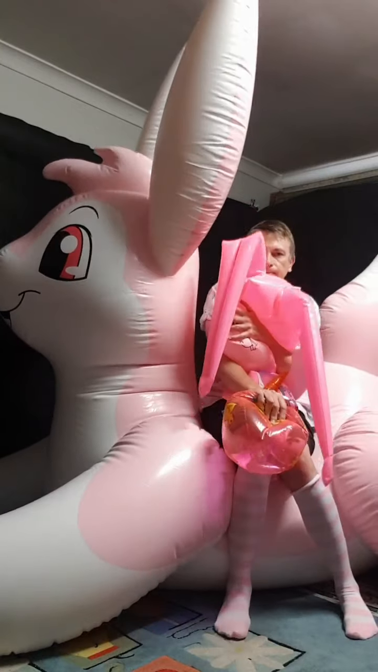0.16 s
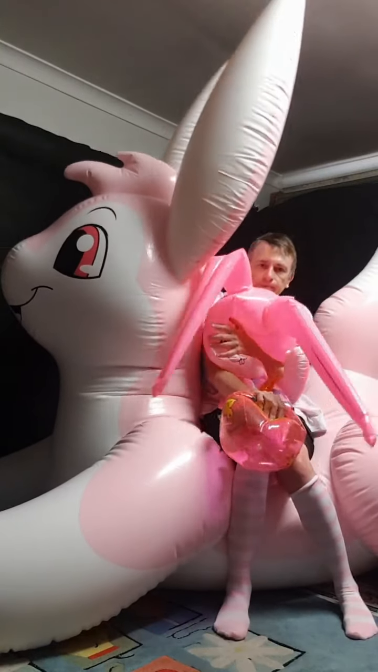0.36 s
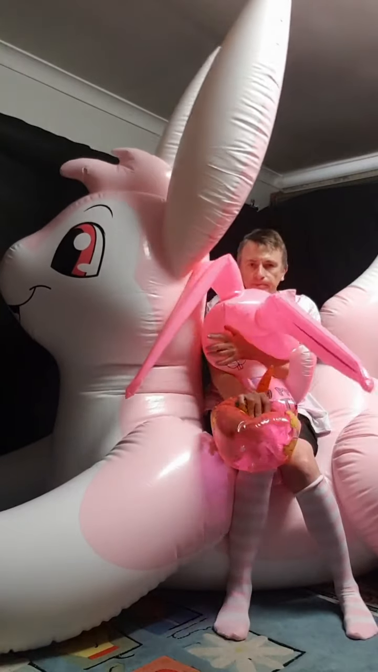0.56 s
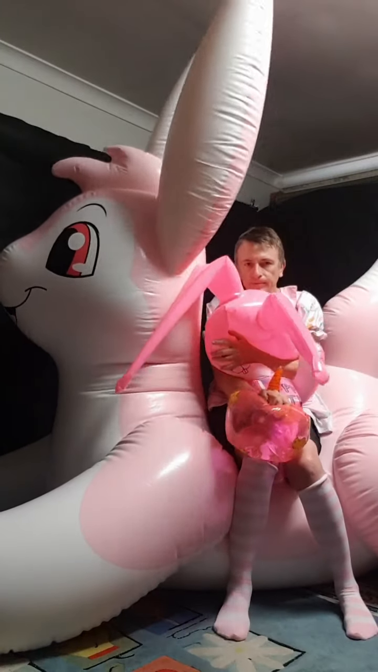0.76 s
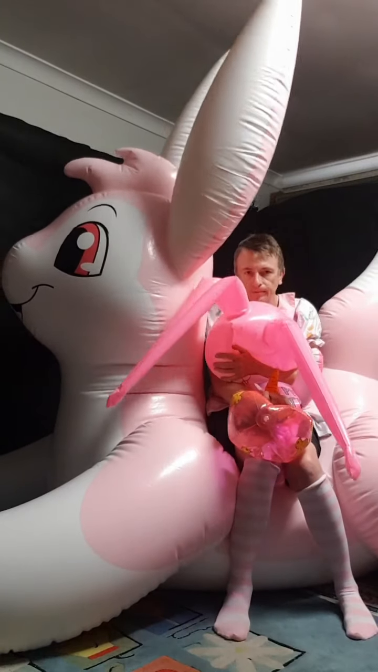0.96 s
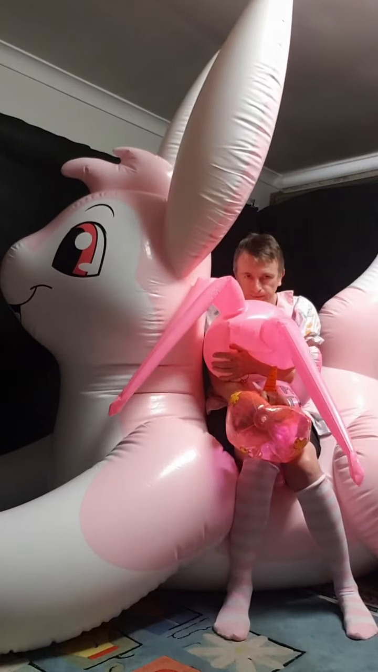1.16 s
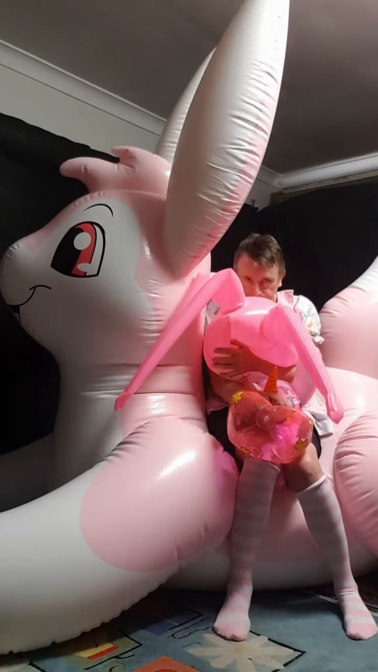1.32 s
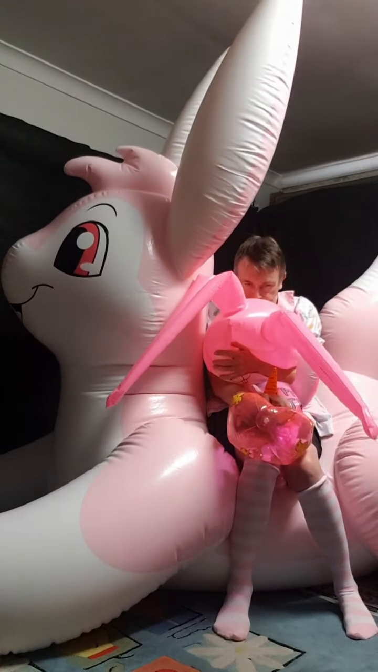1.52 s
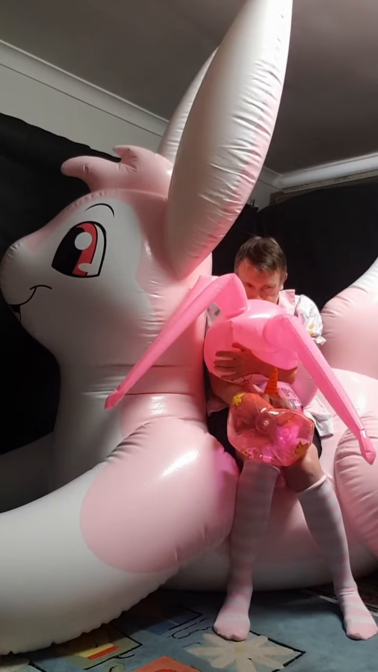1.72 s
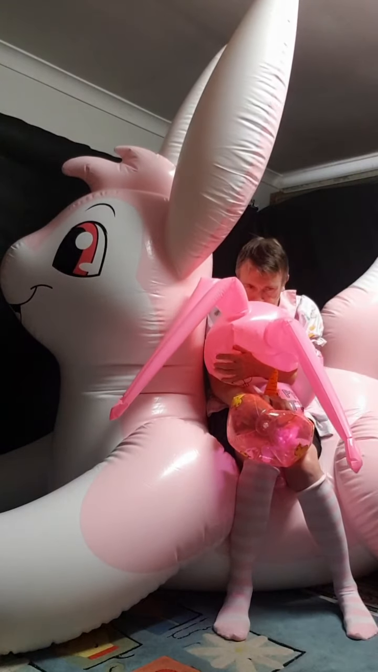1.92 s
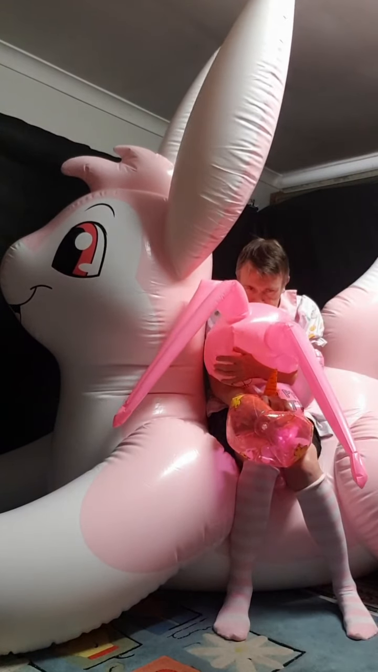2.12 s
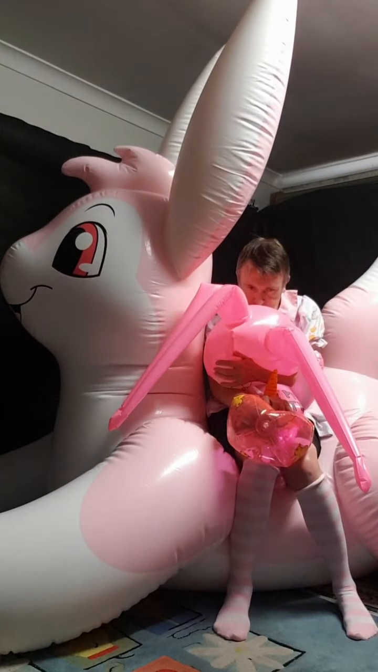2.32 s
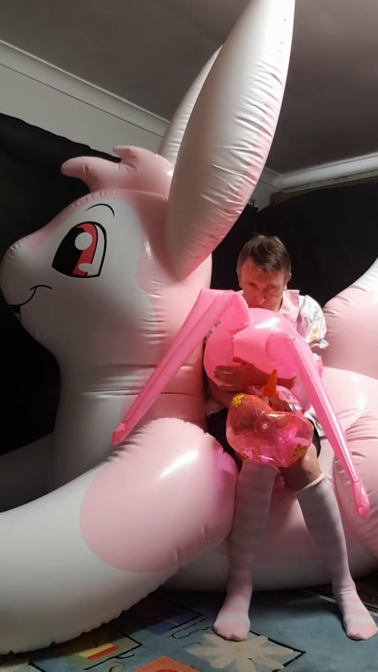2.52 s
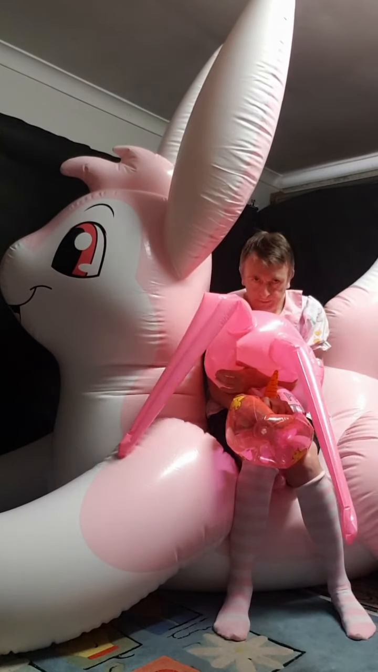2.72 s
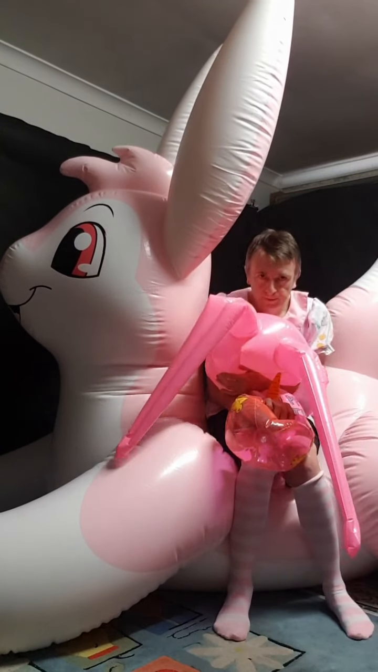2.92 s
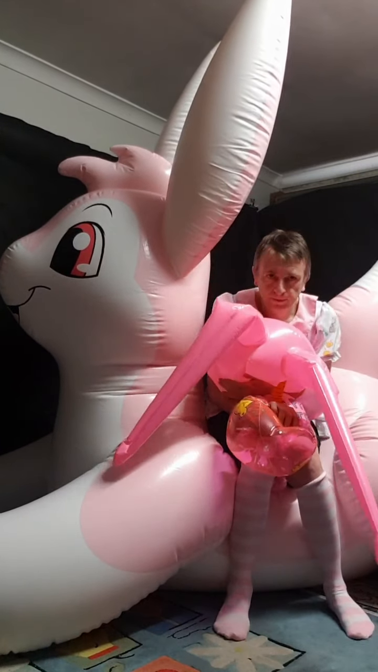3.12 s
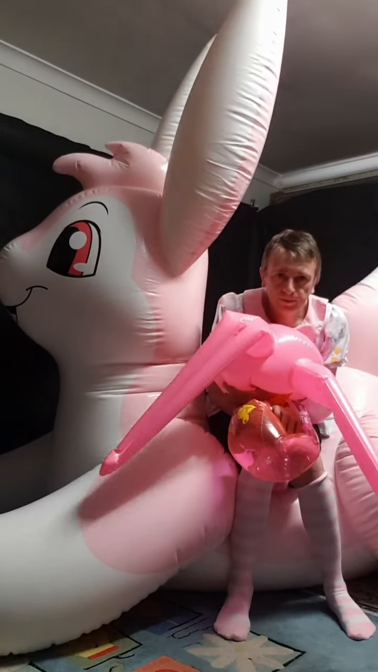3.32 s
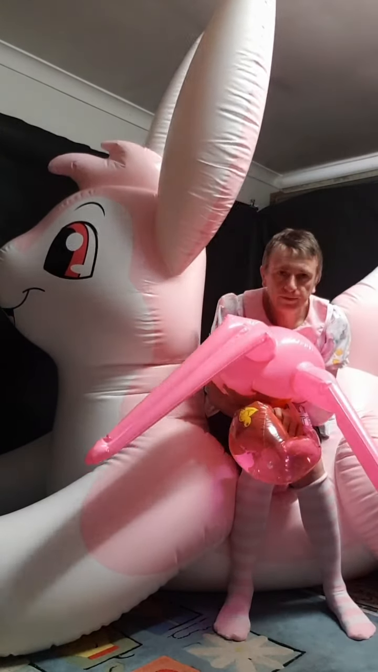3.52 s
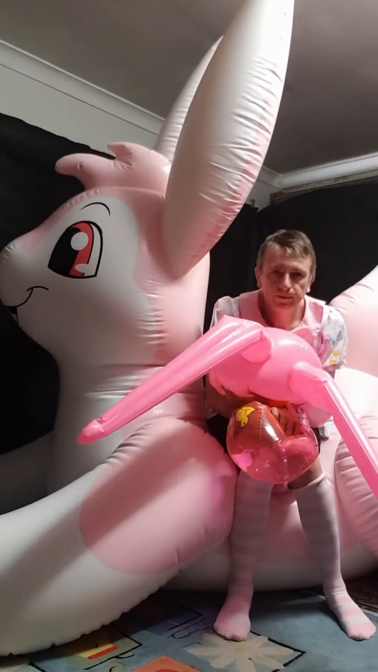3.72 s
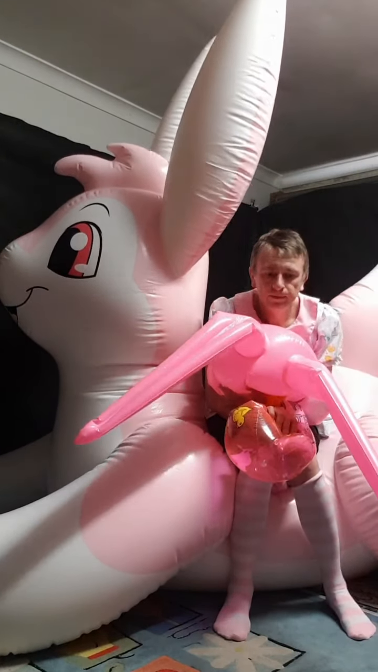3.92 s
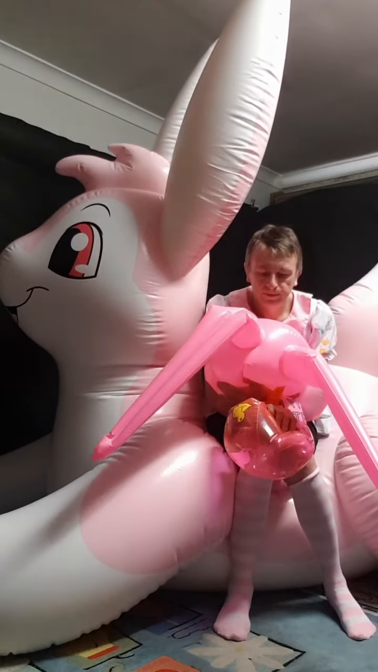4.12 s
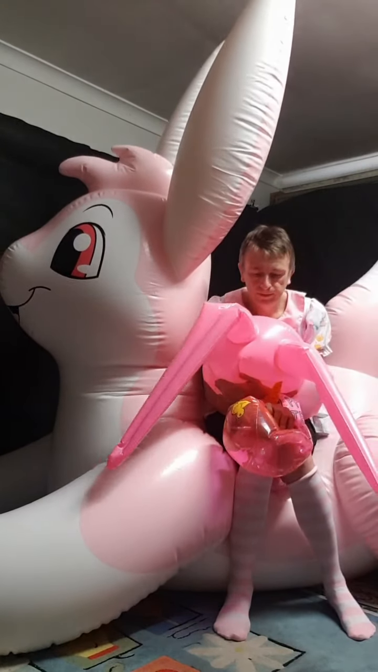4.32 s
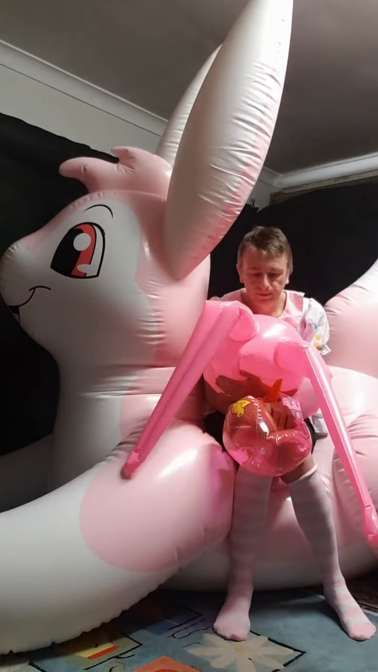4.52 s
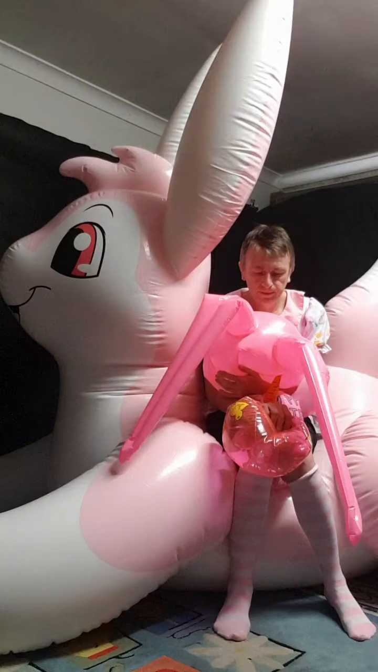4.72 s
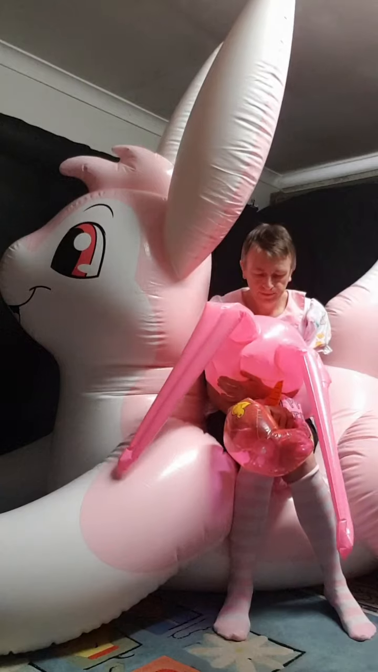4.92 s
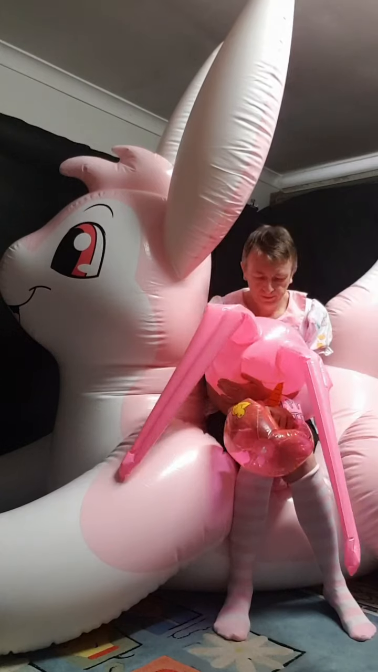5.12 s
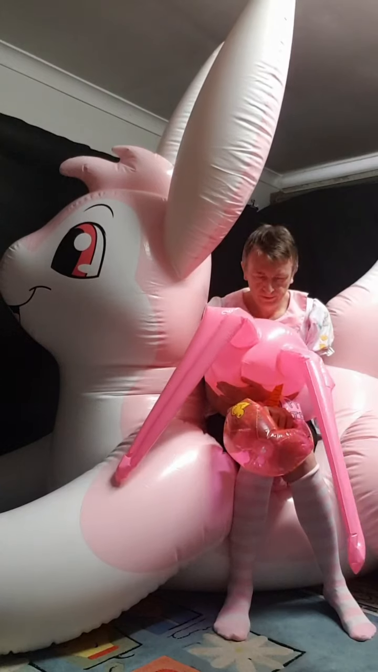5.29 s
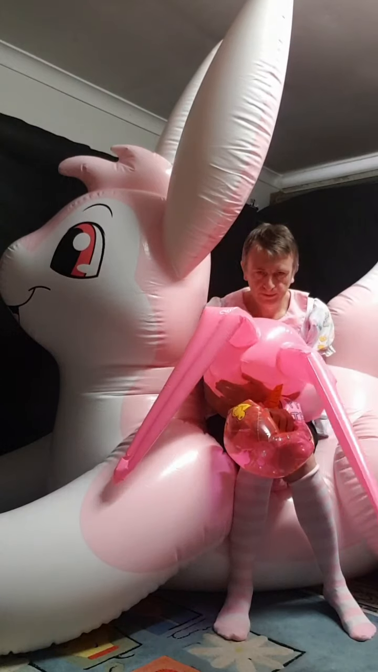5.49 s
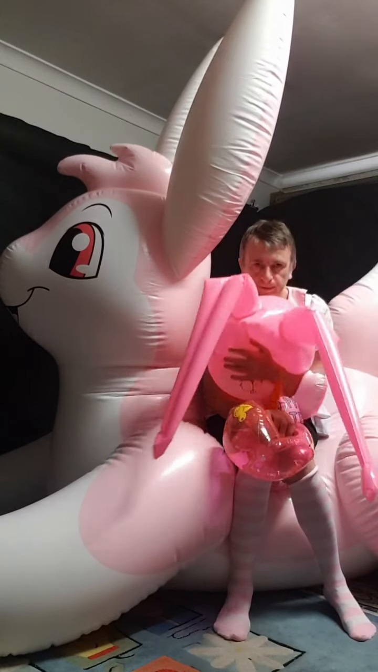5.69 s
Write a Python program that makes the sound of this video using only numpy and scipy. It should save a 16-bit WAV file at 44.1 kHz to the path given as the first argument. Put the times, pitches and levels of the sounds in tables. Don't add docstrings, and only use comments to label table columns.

```python
import sys
import numpy as np
from scipy import signal
from scipy.fft import rfft, irfft
from scipy.io import wavfile

SR = 44100
rng = np.random.default_rng(int(sys.argv[2]) if len(sys.argv) > 2 else 0)


def ratio_of_db(decibels):
    return 10 ** (np.asarray(decibels, float) / 20)


def generate_wav(signal):
    frames = np.transpose(np.atleast_2d(signal))
    scaled = np.clip(frames, -1, 1) * 32767
    pcm = np.round(scaled).astype(np.int16)
    wavfile.write(sys.argv[1], SR, pcm)


N = 253575

# (time [s], jet tone [Hz], tone level [dB], second partial level [dB])
RISING_TONE = [
    (2.215, 1946, -67, -97),
    (2.261, 2356, -65, -75),
    (2.331, 2922, -48.5, -58),
    (2.365, 3007, -61, -43),
    (2.422, 3193, -68, -48),
    (2.5, 3242, -73, -46.5),
    (2.637, 3468, -67, -44.5),
    (2.754, 3492, -70, -42.5),
    (2.81, 3730, -82, -56.5),
]
# (time [s], jet tone [Hz], tone level [dB], second partial level [dB])
CLIMBING_TONE = [
    (2.78, 4780, -51.5, -68),
    (2.869, 4990, -51, -62),
    (2.9, 5069, -36.5, -63.5),
    (2.989, 5142, -42, -55.5),
    (3.11, 5146, -42.5, -56),
    (3.149, 5395, -40, -56.5),
    (3.289, 6213, -32.5, -46.5),
]
# (time [s], jet tone [Hz], tone level [dB], second partial level [dB])
SINKING_TONE = [
    (3.388, 6240, -35.5, -48),
    (3.477, 5997, -37, -48.5),
    (3.63, 5913, -31.5, -53.5),
    (3.712, 5827, -34, -51),
    (3.759, 5608, -36, -53),
    (3.841, 5504, -40.5, -52),
    (3.91, 5173, -42.5, -56),
    (4.011, 4945, -46.5, -66),
    (4.061, 4260, -70, -76),
]
# (time [s], jet tone [Hz], tone level [dB], second partial level [dB])
FALLING_TONE = [
    (4.05, 3200, -88, -50.5),
    (4.086, 3150, -60, -49.5),
    (4.166, 2967, -59.5, -55.5),
    (4.246, 2835, -62, -62),
    (4.29, 2360, -73, -81),
]
# (start [s], length [s], pitch [Hz], tone level [dB], second partial level [dB])
WEAK_WHISTLES = [
    (0.148, 0.063, 1737, -69.5, -68),
    (0.851, 0.038, 2800, -65, -65),
    (0.924, 0.13, 2890, -55, -63),
    (1.061, .09, 3220, -66.5, -64),
    (4.981, 0.13, 2974, -59.5, -56),
    (5.11, 0.28, 2973, -67.5, -59),
    (5.417, 0.093, 2886, -56.5, -60),
]
# (start [s], length [s], first pitch [Hz], last pitch [Hz], level [dB])
EDGE_TONES = [(0.051, 0.12, 1237, 2000, -75), (0.827, .04, 3300, 3500, -68), (.9, .04, 3355, 3500, -61.5),
              (1, .05, 3520, 3560, -82), (1.128, 0.04, 3000, 2225, -67), (1.287, 0.079, 1750, 2170, -71),
              (1.35, 0.19, 2240, 2160, -68.5), (1.494, 0.093, 1974, 1713, -69),
              (1.37, 0.14, 6600, 6650, -79), (1.781, 0.043, 1635, 1960, -68.5),
              (1.92, .13, 6060, 5920, -72.5), (4.03, 0.058, 4440, 4540, -59.5),
              (4.94, 0.064, 2600, 2300, -69), (5.239, 0.23, 3413, 3320, -61), (5.5, .06, 2850, 2040, -68)]
# (start [s], length
# [s], first pitch [Hz], last pitch [Hz], level [dB])
BREATHY_TONES = [
    (0.506, 0.093, 3550, 3560, -68.5),
    (4.4, 0.98, 1097, 1103, -72),
    (4.4, .9, 1239, 1241, -72),
    (4.499, 0.6, 2943, 2965, -72),
    (1.83, .39, 1742, 1733, -73),
    (2.38, 0.5, 2900, 2904, -70),
    (2.4, 0.41, 3380, 4230, -66.5),
    (2.5, 0.294, 3455, 3546, -71),
    (4.06, 0.18, 3310, 3300, -68),
]
PARTIAL_PAN_DB = [2, -6, -23, -49]
# (time [s], level [dB])
FLOW = [(0, -69.5), (.14, -65), (.34, -71.5), (.46, -57), (.7, -59), (.84, -56.5), (1.0, -64), (1.5, -68),
        (2.03, -65), (2.5, -62.5), (2.85, -62), (3.3, -53.5), (3.9, -59), (4.3, -59.5), (4.44, -58),
        (5.1, -56.5), (5.45, -61), (5.75, -56)]
# (frequency [Hz], density [dB per Hz])
JET_SPECTRUM = [(530, -5), (900, 1.5), (933, -7.5), (1260, 0.5), (1440, -8), (1800, 3), (2000, -8.5),
                (2370, 1), (2700, -7), (2980, 3), (3170, -7.5), (3410, -1), (3790, -10), (5400, -8.5),
                (7500, -18), (9750, -43), (16500, -120)]
# (frequency [Hz], density [dB per Hz])
BRIGHT_SPECTRUM = [(3530, -0.5), (6000, 0.5), (7160, -5), (8780, -12), (9230, -8), (10000, 0),
                   (10500, -1.5), (11400, -7), (12900, -3), (15300, -8), (16000, -18)]
# (time [s], level [dB])
GRIP = [(.09, -54.5), (.24, -45.5), (1.04, -48.5), (1.1, -58.5), (1.6, -72), (2.26, -76), (2.37, -52.5),
        (3.05, -42.5), (3.4, -30), (3.6, -50.5), (3.93, -68.5), (4.26, -47), (4.68, -51), (4.78, -63.5),
        (5.04, -61.5), (5.11, -95), (5.38, -66), (5.75, -46)]
# (peak time [s], fall time [s], drumming level [dB])
DRAGS = [
    (0.0, 0.02, -42),
    (.6, 0.24, -56),
    (.82, 0.051, -51.5),
    (1.378, 0.11, -51),
    (1.78, 0.095, -68),
    (3.8, 0.023, -67),
    (4.93, 0.11, -65),
    (5.5, 0.074, -57),
    (.27, .1, -55.5),
    (3.3, 0.13, -38.5),
]
# (time [s], peak level [dB], pitch [Hz])
SKIN_SLIPS = [
    (0.0, -21.5, 145),
              (0.239, -35, 189), (0.266, -28, 161), (0.361, -32.5, 149), (0.657, -31, 210), (0.7, -31, 168),
          (0.815, -31.5, 235), (1.01, -28.5, 192), (2.542, -36, 120), (2.64, -35, 123), (2.743, -30.5, 204),
          (2.837, -31.5, 242), (2.974, -35, 175), (3.045, -33, 129), (3.066, -25.5, 233), (3.161, -26, 182),
          (3.188, -24, 163), (3.24, -24, 121.9), (3.282, -23, 101), (3.3, -29, 129), (3.334, -17, 199),
          (3.376, -16, 176.4), (3.43, -15.5, 127), (3.463, -13.5, 120), (3.483, -23.5, 131),
          (3.559, -26, 148.6), (4.27, -36, 210), (4.507, -35, 110), (4.633, -31, 190), (5.695, -33, 98),
          (5.728, -35, 134)]
# (frequency [Hz], width [Hz], level [dB])
CHAMBER_MODES = [(77.5, 28, 1), (126.6, 9.3, 2.5), (151, 8.2, -6), (222, 12.1, 7.5), (295.7, 21, -7),
                 (371.5, 14, -13)]
# (frequency [Hz], density [dB per Hz])
RUB_SPECTRUM = [(310, -2), (520, -1), (560, 1), (633, 0.5), (685, 2), (983, -10.5), (1140, 0.5),
                (1450, -14), (1710, -13), (2000, -13), (2600, -24), (4400, -120)]
# (time [s], peak level [dB], brightness [dB])
TICKS = [(0.0912, -74, 13), (0.1957, -53, -23), (0.4509, -71, -6), (0.548, -49, -6), (0.805, -48, 7),
         (0.8649, -58, -6), (1.0434, -59, 1), (1.1453, -60, 2), (1.2214, -77, -30), (1.284, -55.5, -44),
         (1.573, -52.5, -18), (1.729, -53, -15), (1.9874, -57, 18), (2.0622, -60, 23), (3.7706, -46, -18),
         (4.392, -46.5, -20), (5.3333, -58, -12), (5.4894, -66, 22)]
# (frequency [Hz], density [dB per Hz])
FLOOR_SPECTRUM = [(15, -49), (25, 1), (70, 5.5), (335, -28), (658, 9), (961, -12), (1130, -36), (1740, -22),
                  (1990, -3.5), (2910, -2.5), (3160, -91), (5720, -1.5), (8820, -59), (13200, -62.5),
                  (16000, -3)]
# (frequency [Hz], left-right likeness [0 to 1])
LIKENESS = [(60, 0.46), (250, 0.093), (500, 0.48), (2000, 0.29), (8000, 0.0084)]
# (frequency [Hz], left minus right [dB])
LEAN = [(60, -4), (180, -3), (550, -0.5), (1650, 0.5), (4970, 3), (15000, -14.5)]


def valve():
    fourth_db, third_db = -38, -51
    sag_hz_per_s = 180
    rise = [(*row, row[-1] + fourth_db) for row in RISING_TONE]
    main = [(*row, row[2] + third_db) for row in CLIMBING_TONE + SINKING_TONE]
    out = whistle(rise, orders=[1, 2, 4], waver=(.002, .003), flutter=.35, halo=.07, step_hz=135)
    out += whistle(main, orders=[1, 2, 3], waver=(.002, .002), flutter=.33, halo=.06, step_hz=210)
    out += whistle(FALLING_TONE, orders=[1, 2], waver=(.004, .006), flutter=.28, halo=.2, step_hz=139.7)
    for start, length, hz, db, second_db in WEAK_WHISTLES:
        row = (start, length, hz, hz - sag_hz_per_s * length, db)
        path = glide(row, second_db - db)
        out += whistle(path, orders=[1, 2], waver=(.003, .006), flutter=.33, halo=.3, step_hz=30)
    for row in EDGE_TONES:
        out += whistle(glide(row), orders=[1], waver=(.006, .016), flutter=.45, halo=.3, step_hz=30)
    for row in BREATHY_TONES:
        out += whistle(glide(row), orders=[1], waver=(.012, .04), flutter=.7, halo=.6)
    return out


def whistle(rows, orders, waver, flutter, halo, step_hz=150):
    s = np.arange(N) / SR
    hz, *levels_db = in_time(rows)
    gate = np.clip(np.minimum(s - rows[0][0], rows[-1][0] - s) / 0.0031, 0, 1)
    on = gate > 0
    size, hz = on.sum(), hz[on]
    hz = hz - 0.648 * step_hz / (2 * np.pi) * np.sin(2 * np.pi * hz / step_hz)
    bend = 1 + waver[0] * drift(36.4, size) + waver[1] * drift(300, size)
    phase = 2 * np.pi * np.cumsum(hz * bend) / SR
    out = np.zeros((2, N))
    for order, level_db in zip(orders, levels_db):
        strength = 1 + flutter * drift(40, size) + halo * drift(800, size)
        level = np.sqrt(2) * (gate * ratio_of_db(level_db))[on]
        tone = level * strength * np.sin(order * phase) * (order * hz < 15900)
        pan_db = PARTIAL_PAN_DB[int(np.clip(order * hz.mean() // 4000 - 1, 0, 3))]
        out[:, on] += tone * ratio_of_db([[pan_db / 2], [-pan_db / 2]])
    return out


def glide(row, *partials_db):
    start, length, first_hz, last_hz, db = row
    bend = min(0.06 / length, 1)
    # (share of length, level [dB], share of pitch flat)
    shape = [(0, -4, .02), (.15, 0, 0), (1 - .2, 0, 0), (1, -4, .025)]
    rows = []
    for share, change_db, flat in shape:
        hz = (first_hz + share * (last_hz - first_hz)) * (1 - flat * bend)
        level_db = db + change_db
        rows.append((start + share * length, hz, level_db, *(level_db + p for p in partials_db)))
    return rows


def squeeze_hiss():
    s = np.arange(N) / SR
    gate = np.clip(np.minimum(s - CLIMBING_TONE[0][0], SINKING_TONE[-1][0] - s) / 0.04, 0, 1)
    return ratio_of_db(-58.5) * gate * rms_one(band(rng.standard_normal((2, N)), 5500, 8400))


def jet_hiss(flow_db):
    return ratio_of_db(flow_db + 0.5) * coloured(JET_SPECTRUM, 0.78, ref_hz=(1600, 4500))


def bright_hiss(grip, flow):
    opening_db = 1.07 * (np.arange(N) - N / 2) / SR
    level_db = -63 + 0.057 * grip + 0.8 * flow + opening_db
    return ratio_of_db(level_db) * coloured(BRIGHT_SPECTRUM, 1.6, ref_hz=(7800, 16000))


def handling():
    (grip_db,), (flow_db,) = in_time(GRIP), in_time(FLOW)
    t, rise_s = np.arange(N) / SR, 0.038
    drags = np.zeros(N)
    for at, fall_s, db in DRAGS:
        distance = np.where(t < at, (at - t) / rise_s, (t - at) / fall_s)
        drags += ratio_of_db(db) * np.exp(-distance ** 2)
    return 20 * np.log10(ratio_of_db(grip_db) + drags), flow_db


def skin(grip_db):
    slips_per_s = 350
    size = np.minimum(rng.exponential(1, N), 3)
    slips = (rng.random(N) < slips_per_s / SR) * rng.choice([-1, 1], N) * ratio_of_db(3.2 * size)
    clumped = slips * ratio_of_db(1.94 * drift(11.3, N)) + 1e-18
    soft = band(band(clumped, 38, 428), 40, 655)
    small = ratio_of_db(grip_db - 2) * rms_one(0.45 * soft + chamber(soft))
    big = thumps()
    return small + big + ratio_of_db(-17.5) * chamber(big + 1e-18)


def thumps():
    big, s = np.zeros(N), np.arange(2600) / SR
    blows = SKIN_SLIPS
    for (at, peak_db, hz), noise in zip(blows, rng.standard_normal((len(blows), 2600))):
        cycles = s * np.clip(hz, 70, 300)
        swell = np.minimum(cycles / .45, 1) * np.exp(-(cycles / 1.15) ** 2)
        push = band(np.sin(2 * np.pi * cycles) * swell, 40, 1000)
        snap = band(noise * np.exp(-s / 0.0016), 150, 660)
        blow = ratio_of_db(-5.5) * push / np.abs(push).max() + ratio_of_db(-17.5) * snap / np.abs(snap).max()
        i = round(at * SR)
        big[i:i + 2600] += ratio_of_db(peak_db) * blow[:N - i]
    return big


def chamber(x):
    out = 0
    for k, (hz, width_hz, db) in enumerate(CHAMBER_MODES):
        out = out + ratio_of_db(db) * resonance(x, hz, width_hz) * (-1) ** k
    return out


def rubbing(grip, flow):
    level_db = -63 + 0.45 * grip + 0.35 * flow
    return ratio_of_db(level_db) * coloured(RUB_SPECTRUM, 2.96, ref_hz=(550, 1600))


def creases():
    out, s = np.zeros((2, N)), np.arange(900) / SR
    for (at, peak_db, bright_db), noise in zip(TICKS, rng.standard_normal((len(TICKS), 2, 900))):
        puff = noise * np.exp(-s / .006)
        tick = band(puff, 1300, 7800) + ratio_of_db(bright_db - 3) * band(puff, 5000, 19000)
        i = round(at * SR)
        out[:, i:i + 900] += (ratio_of_db(peak_db + 3) * tick / np.abs(tick).max())[:, :N - i]
    return out


def room(x):
    t60_s, gap_s = .27, .003
    s = np.arange(int(.5 * SR)) / SR
    tail = rng.standard_normal((2, len(s))) * ratio_of_db(-60 * s / t60_s) * (s > gap_s)
    tail /= np.sqrt(np.sum(tail ** 2, axis=1, keepdims=True))
    return signal.fftconvolve(x, tail, axes=1)[:, :N]


def lag_left(x):
    lag_s = 3.6e-5
    turn = np.exp(-2j * np.pi * np.minimum(np.fft.rfftfreq(N, 1 / SR), 6300) * lag_s)
    return np.array([irfft(rfft(x[0]) * turn, N), x[1]])


def room_floor():
    return ratio_of_db(-65.5) * coloured(FLOOR_SPECTRUM, 0.39, ref_hz=(25, 16000))


def coloured(spectrum, flicker_db, ref_hz):
    hz = np.maximum(np.fft.rfftfreq(N, 1 / SR), 1)
    mid, side = rfft(rng.standard_normal((2, N)))
    alike = np.clip(at_hz(LIKENESS, hz), 0, 1)
    lean = ratio_of_db(at_hz(LEAN, hz) / 2)
    mid, side = np.sqrt(1 + alike) * mid, np.sqrt(1 - alike) * side
    pair = ratio_of_db(at_hz(spectrum, hz)) * np.array([(mid + side) * lean, (mid - side) / lean])
    pair *= np.minimum(hz / spectrum[0][0], 1) ** 4
    inside = (hz > ref_hz[0]) & (hz < ref_hz[1])
    scale = np.sqrt(np.mean(irfft(pair.mean(0) * inside, N) ** 2))
    return irfft(pair, N) / scale * ratio_of_db(flicker_db * drift(12.1, N))


def drift(rate, size):
    r = np.exp(-16 * np.pi * rate / SR)
    noise = rng.standard_normal(size // 8 + 2002)
    slow = signal.lfilter([1], [1, -2 * r, r * r], noise)[2000:]
    return np.interp(np.arange(size) / 8, np.arange(len(slow)), rms_one(slow))


def resonance(x, hz, width_hz):
    r = np.exp(-np.pi * width_hz / SR)
    poles = [1, -2 * r * np.cos(2 * np.pi * hz / SR), r * r]
    return signal.lfilter([(1 - r * r) / 2, 0, (r * r - 1) / 2], poles, x)


def band(x, low_hz, high_hz):
    return signal.sosfilt(signal.butter(2, [low_hz, high_hz], "band", fs=SR, output="sos"), x)


def rms_one(x):
    return x / np.sqrt(np.mean(x ** 2) + 1e-20)


def in_time(rows):
    s, *columns = np.transpose(rows)
    return [np.interp(np.arange(N) / SR, s, c) for c in columns]


def at_hz(points, hz):
    points_hz, values = np.transpose(points)
    return np.interp(np.log(hz), np.log(points_hz), values)


def scene():
    grip_db, flow_db = handling()
    grip, flow = grip_db - grip_db.mean(), flow_db - flow_db.mean()
    tones = valve() + creases()
    tones = ratio_of_db(5) * (tones + ratio_of_db(-3.5) * room(tones))
    drum = skin(grip_db) * ratio_of_db([[-.7], [.7]])
    boom = room(drum)
    common = boom.mean(0)
    drum = drum + ratio_of_db(-10) * (common + .4 * (boom - common))
    near = lag_left(drum + rubbing(grip, flow) + tones + jet_hiss(flow_db))
    return near + bright_hiss(grip, flow) + squeeze_hiss() + room_floor()


def top_cut(x):
    return signal.sosfilt(signal.butter(12, 15800, fs=SR, output="sos"), x)


def record(dry):
    return top_cut(dry)


dry = scene()
out = record(dry)
generate_wav(out)
```